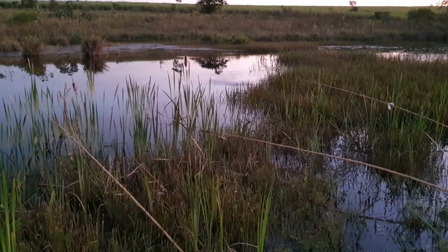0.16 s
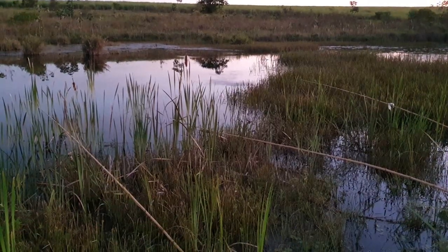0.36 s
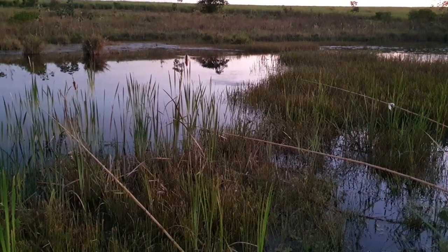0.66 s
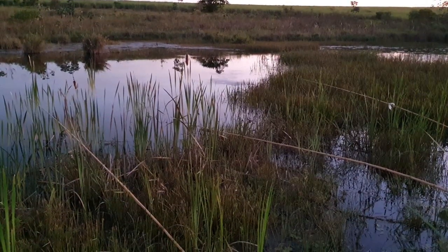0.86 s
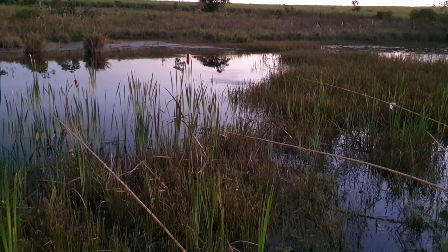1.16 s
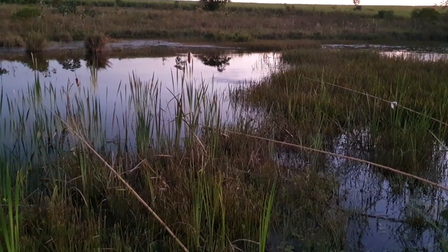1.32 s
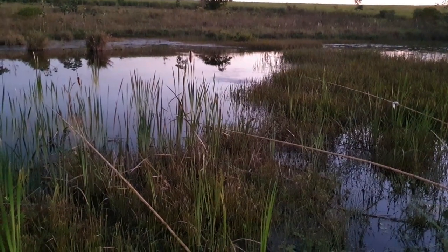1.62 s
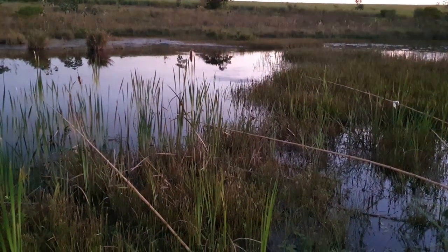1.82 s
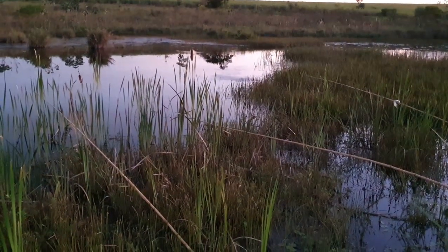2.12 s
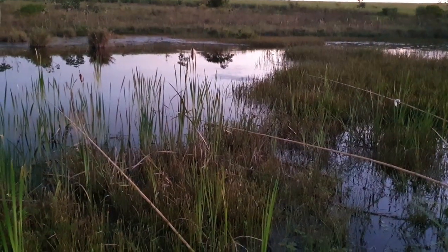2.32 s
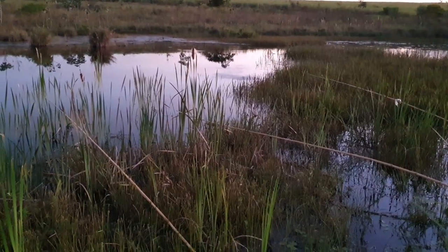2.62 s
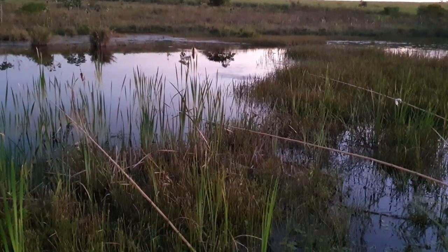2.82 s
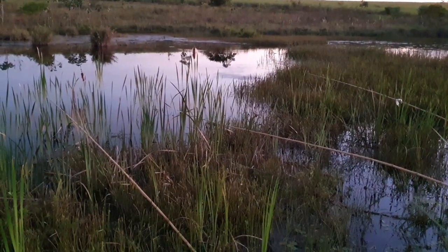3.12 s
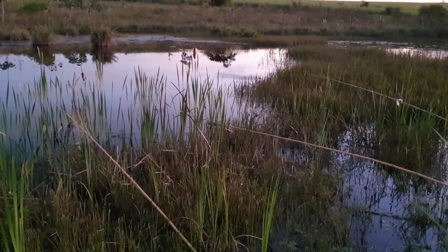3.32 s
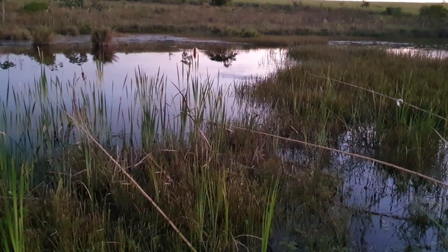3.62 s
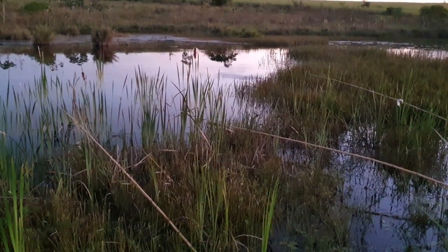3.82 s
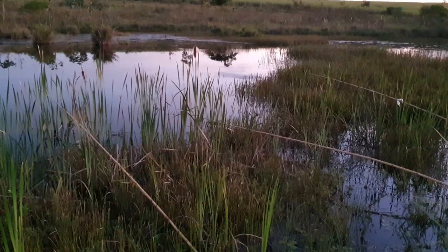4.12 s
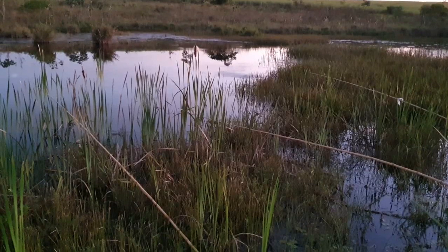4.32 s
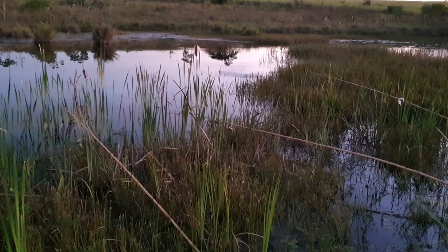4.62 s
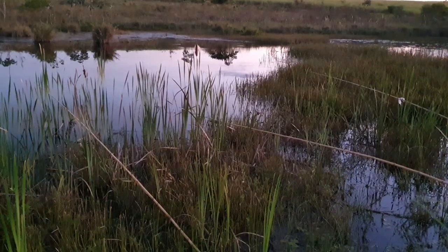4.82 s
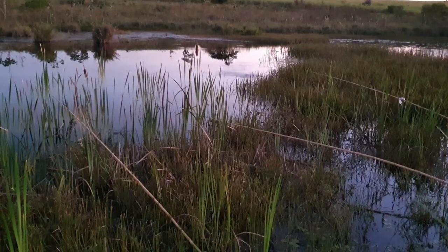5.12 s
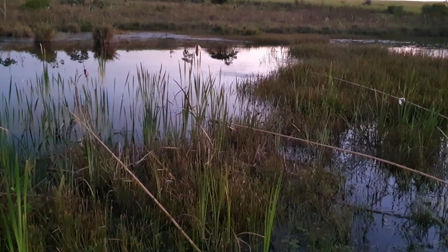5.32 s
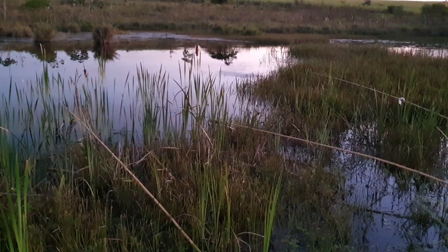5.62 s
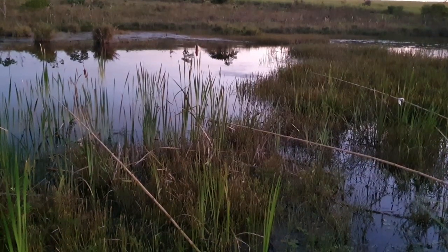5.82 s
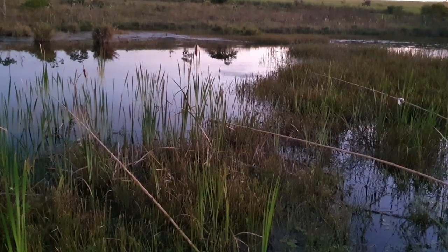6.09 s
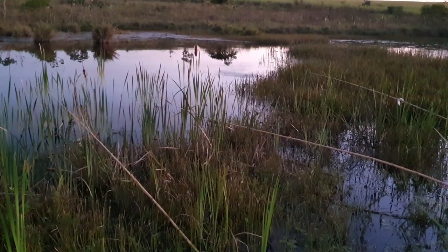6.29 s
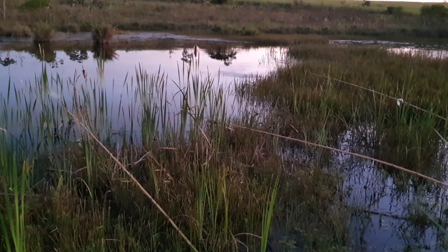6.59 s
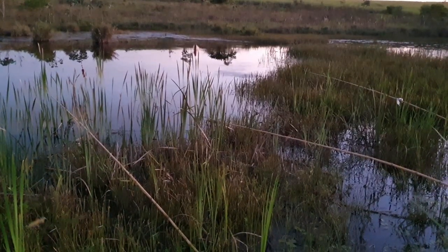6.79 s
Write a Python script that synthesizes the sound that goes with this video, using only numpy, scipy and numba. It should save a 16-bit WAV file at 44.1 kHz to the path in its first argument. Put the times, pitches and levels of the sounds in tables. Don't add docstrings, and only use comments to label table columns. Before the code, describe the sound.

Dense evening frog chorus at a reedy pond: near raspy croaking notes, overlapping nasal toad buzzes, fast katydid ticking and an occasional small plop.

```python
import sys
import numpy as np
from scipy import signal
from scipy.fft import rfft, irfft
from scipy.io import wavfile
from numba import njit

SR = 44100
rng = np.random.default_rng(int(sys.argv[2]) if len(sys.argv) > 2 else 0)


def transcribe(u):
    v = np.clip(np.atleast_2d(u).T, -1, 1)
    q = np.round(v * 32767).astype(np.int16)
    wavfile.write(sys.argv[1], SR, q)


def boost(x):
    u = np.asarray(x, float) / 20
    return 10 ** u


N = 306495
PORT_LAG_S = 0.000431
# (frequency [Hz], level [dB], decay t60 [s])
TOAD_MODES = [
    (5073, 2.5, 0.0075),
    (3260, -1.5, 0.0047),
    (8970, -6.5, 0.0029),
    (3360, -12.5, 0.014),
    (6480, -4.5, 0.0034),
]


@njit
def rings(size, start, hz, gain, rise, t60):
    out = np.zeros(size)
    for k in range(len(start)):
        i0 = max(int(np.ceil(start[k])), 0)
        turn = 2j * np.pi * hz[k] / SR - np.log(1000.) / (t60 * SR)
        p, q = np.exp(turn), np.exp(-1 / (rise * SR))
        z, e = gain[k] * np.exp(turn * (i0 - start[k])), q ** (i0 - start[k])
        for i in range(i0, min(i0 + int(t60 * SR * 3 / 4), size)):
            out[i] += z.imag * (1 - e) ** 2
            z, e = z * p, e * q + 1e-30
    return out


def heard(s, hz, db, rise, t60, pan_db=0., lag=PORT_LAG_S):
    s, hz, db, pan_db, lag = (1. * v.ravel() for v in np.broadcast_arrays(s, hz, db, pan_db, lag))
    ports = []
    for k in range(2):
        gain = boost(db + (.5 - k) * pan_db)
        ports.append(rings(N, (s + k * lag) * SR, hz, gain, 1. * rise, 1. * t60))
    return np.array(ports)


def curve(table, s):
    t, *columns = np.transpose(table)
    return [np.interp(s, t, c) for c in columns]


def reeds(x, db, t60):
    t = np.arange(SR // 5) / SR
    tail = rng.standard_normal((2, len(t))) * boost(-60 * t / t60) * (t > .003)
    tail *= boost(db) / np.sqrt(np.sum(tail ** 2, axis=1, keepdims=True))
    return x + signal.fftconvolve(x, tail, axes=1)[:, :N]


def pulses(table, period_s):
    peak, before, after = np.transpose(table)[:3, :, None]
    beat = np.arange(-10, 9) / 2
    silent = (beat < -before - .25) | (beat > after + .25)
    return peak + period_s * beat, beat, silent


def air():
    # (frequency [Hz], level [dB per Hz])
    evening = [(25, -112), (68, -91.5), (135, -101), (500, -100), (1400, -107), (2200, -99), (3100, -85.5),
               (4500, -69.5), (6000, -104), (7500, -106), (9500, -95), (12500, -93.5), (14400, -99),
               (14900, -112)]
    hz = np.fft.rfftfreq(N, 1 / SR) + 1
    at_hz, level_db = np.transpose(evening)
    colour = boost(np.interp(np.log(hz), np.log(at_hz), level_db, right=-150))
    shared = np.clip(.45 - hz / 2500, 0, 1)
    common, left, right = rfft(rng.standard_normal((3, N)))
    tilt_db = np.interp(hz, (300, 5000, 13000), (-1.5, 1.2, -4))
    ports = np.sqrt(shared) * common + np.sqrt(1 - shared) * np.array([left, right])
    ports = boost(np.array([tilt_db, -tilt_db]) / 2) * ports
    return irfft(colour * ports, N) * np.sqrt(SR / 2) * boost(2.5)


def bleat(s, db, pan_db, sac_hz, lag, head, modes):
    out = heard(s, sac_hz, db, 0.00021, 0.011, pan_db, lag)
    for hz, mode_db, t60 in modes:
        out += heard(s, hz * head, db + mode_db, 0.00038, t60, pan_db, lag)
    return out


def solo_toads():
    # (start [s], end [s], level [dB], left minus right [dB], first pitch [Hz])
    solo_bleats = [
        (-.25, .859, -27.5, -5, 4430),
        (.699, 1.51, -34, -4, 3400),
        (1.198, 1.58, -36.5, -3, 5000),
        (1.75, 2.65, -31.5, 1, 4260),
        (3.101, 4, -40.5, -4, 4400),
        (4.252, 5.12, -30.5, -1, 4600),
        (5.06, 6.03, -27.5, -5.5, 4070),
        (4.92, 5.85, -32.5, 7, 3960),
        (6, 7.3, -34.5, -7, 3700),
        (4.68, 5.1, -41.5, 3, 5100),
    ]
    close_rows = (0, 6, 7, 9)
    out = 0
    for row, (start, end, db, pan_db, hz0) in enumerate(solo_bleats):
        hz1 = 4716 + 20 * (db + 29.5)
        draw = rng.standard_normal((200, 2)).T
        part = np.arange(200) / (126 * (end - start))
        filled = np.minimum(part, 1)
        rate_hz = np.interp(part, (0, 1), (133, 119))
        s = start + np.cumsum((1 + 0.00499 * draw[0]) / rate_hz)
        swell_db = -14 * np.exp(-part / 0.056) - 9 * part ** 6 - 200 * (part > 1) + 1.05 * draw[1]
        lag = PORT_LAG_S * rng.uniform(-1.175, 1)
        modes = TOAD_MODES if row in close_rows else TOAD_MODES[:2]
        sac_hz = hz0 + (hz1 - hz0) * filled ** 0.87
        out = out + bleat(s, db + 7 + swell_db, pan_db, sac_hz, lag, 0.986 + 0.024 * filled, modes)
    return reeds(out, -4.0, 0.02)


def toad_crowd(count=12):
    # (time [s], level [dB], left minus right [dB])
    crowd_swell = [(0, -32, 0), (.6, -32, 2), (.9, -37.5, 2), (1.3, -31, -1.5), (1.65, -35.5, 1),
                   (2.0, -32, 1.5), (2.45, -30.5, 0.5), (2.75, -36, 0), (3.05, -40.5, 2.5), (3.5, -37.5, 4),
                   (4.1, -38, 1.5), (4.45, -35.5, 4.5), (5.0, -38.5, -3.5), (5.25, -32.5, 0),
                   (5.8, -31, 4.5), (6.08, -37, 0.5), (6.5, -36, 6), (6.95, -37, 2.5)]
    size, side = rng.uniform(-1, 1, (count, 2, 1)).transpose(1, 0, 2)
    draw = rng.standard_normal((count, 2, 950)).transpose(1, 0, 2)
    part = (np.arange(950) / 170 + np.arange(count)[:, None] / count) % 1
    s = -.1 + np.cumsum((1 + .012 * draw[0]) / (135 + 4 * size - 17 * part), axis=1)
    db, pan_db = curve(crowd_swell, s)
    db = db + 2.0 + 15 * np.log10(np.sin(np.pi * part) + 0.016) + 2.67 * draw[1]
    lag = PORT_LAG_S * np.minimum(0.74 + 1.63 * side, 1)
    sac_hz = (4050 + 500 * part) * (1 + 0.098 * size)
    head = 1 + 0.081 * size + 0.017 * draw[0]
    return reeds(bleat(s, db, pan_db, sac_hz, lag, head, TOAD_MODES[:2]), -1.73, 0.21)


def distant_frogs():
    # (time [s], level [dB])
    rasp_swell = [
        (0.0, -60),
        (0.44, -44),
        (1.86, -62),
        (2.17, -44.5),
        (3.12, -90),
        (3.6, -61),
        (3.89, -44),
        (4.95, -61),
        (5.21, -49.5),
        (6.95, -55),
    ]
    draw = rng.random((1400, 4)).T
    s = draw[0] * N / SR
    db = curve(rasp_swell, s)[0] - 1.5 + 6 * draw[1]
    hz = 1500 + 1200 * draw[2] ** 0.655
    sac = heard(s, hz, db, 0.00039, 0.02, -4.5)
    body = heard(s, 650 + 350 * draw[3], db - 12.5, 0.0016, 0.053, -3.1)
    return reeds(sac + body, -0.32, 0.42)


def far_frogs():
    # (start [s], pulses [count], peak level [dB])
    answers = [(0.0332, 4.93, -30), (0.4341, 4.9, -30.5), (0.8103, 5.54, -32.5), (1.2307, 5.5, -34.5),
               (1.6612, 6.2, -38), (2.1124, 7.3, -36), (2.2074, 4, -41), (2.6022, 4.5, -35),
               (2.9519, 5.07, -38), (3.6128, 6.2, -33.5), (4.0075, 5.2, -31.5), (4.0999, 6, -33.5),
               (4.4546, 4.44, -29), (4.784, 5.44, -31), (5.2468, 4.8, -33), (5.436, 3.8, -34),
               (5.6295, 5.6, -34.5), (5.8558, 6.9, -31.5), (6.1114, 4.53, -31.5), (6.5426, 4, -28.5),
               (6.9297, 1.6, -28.5)]
    start, count, peak_db = np.transpose(answers)[:, :, None]
    beat = np.arange(14) / 2 - .5
    draw = rng.standard_normal((len(answers), 6, 14)).transpose(1, 0, 2)
    s = start + .0258 * beat + 0.000705 * draw[0]
    weak_db = 8 * (beat % 1)
    db = peak_db - 24 * ((beat + 2.05) / (count + 0.18) - .55) ** 2 - weak_db
    db = db - 2.2 * np.exp(-beat / 1.46) + 1.5 * draw[5]
    db = db - 200 * (beat > np.round(count) - .75)
    filling_db = 25 * np.exp(-np.maximum(beat, 0) / 1.1)
    out = heard(s - .002, 735 + 15 * draw[4], db - 10.5 - 12 * (beat % 1), 0.0013, 0.044, -0.68)
    sac_tones = ((1815, 1.5, -8.5), (2146, 8.5, -6.0), (2416, 7.0, -5.5))  # (Hz, dB, left minus right dB)
    for d, (hz, mode_db, pan_db) in zip(draw[1:], sac_tones):
        tone_db = db + mode_db - filling_db * (hz / 1700 - 1)
        out += heard(s, hz * (1 + 0.03 * d), tone_db, 0.0011, 0.017, pan_db)
    return reeds(out, -0.13, 0.12)


def katydid():
    chirp_pace = [.0638, .488, .9125, 1.3413, 1.7681, 2.196, 2.6071, 3.0386, 3.4601, 3.8812, 4.3014, 4.732,
                  5.156, 5.5905, 5.9898, 6.4071, 6.8357, 7.26]
    count = len(chirp_pace)
    chirps = np.interp(np.arange(6 * count - 6) / 6, np.arange(count), chirp_pace)
    stroke, tooth = np.arange(5)[:, None], np.arange(5)
    s = chirps[:, None, None] + 0.013 * stroke + 0.0026 * tooth
    draw = rng.standard_normal((4,) + s.shape)
    db = -41.5 - 8.1 * (stroke == 4) - 6 * tooth ** 0.8 + 0.99 * draw[0]
    s, db = (s + 0.000187 * draw[1]).ravel(), db.ravel()
    low, high = draw[2].ravel(), draw[3].ravel()
    out = heard(s, 12380 * (1 + 0.02 * low), db - 2.5, .0001, 0.0069, -6.5)
    out += heard(s, 13040 * (1 + 0.02 * high), db - 5.5, .0001, 0.0069, -6.5)
    out += heard(s, 13600 * (1 + 0.024 * high), db + 0.5, .00008, .0022, -5.0)
    return reeds(out, 1.2, 0.027)


def hoots():
    # (start [s], level [dB])
    hoot_notes = [
        (.2, -65),
        (1.08, -64.5),
        (1.9, -63),
        (2.64, -64),
        (3.38, -66),
        (4.12, -65),
        (4.91, -66.5),
        (5.76, -64),
        (6.54, -67),
    ]
    # (loudest time [s], level [dB], time to fade 20 dB [s])
    low_calls = [
        (2.9, -62.5, 0.54),
        (5.7, -60.5, 0.96),
    ]
    t, out = np.arange(N) / SR, 0
    for s, db in hoot_notes:
        age = np.clip(t - s, 0, .13)
        swell = np.sin(np.pi * age / .13) ** 2
        out = out + boost(db) * swell * np.sin(2 * np.pi * (530 * age - 380 * age ** 2))
    draw = rng.random((600, 2)).T
    s = draw[0] * N / SR
    call_db = [db - 20 * np.where(s < at, 3.0, 1) * abs(s - at) / fade for at, db, fade in low_calls]
    return out + heard(s, 270 + 230 * draw[1], np.max(call_db, axis=0) + 4, 0.02, 0.31)


def near_pulses():
    # (loudest pulse [s], pulses before [count], pulses after [count], peak [dB], weak pulse [dB])
    near_notes = [
        (0.3201, 3, 2, -19.5, -7.5),
        (0.6938, 3, 2, -20.5, -10),
        (1.1122, 3, 2, -19.5, -5.5),
        (1.5297, 3, 2, -20.5, -8),
        (2.0192, 3, 2, -21.5, -19),
        (4.2257, 5, 1.5, -18, -9),
        (4.5264, 3, 3, -18, -10.5),
        (5.1269, 2.5, 2, -21, -7.5),
        (6.3625, 2.5, 3, -19.5, -2.5),
        (6.7977, 3, 2, -19, -4.5),
    ]
    # (time [s], peak level [dB])
    stutters = [
        [(3.6264, -31), (3.6379, -30.5), (3.68, -23), (3.6976, -22.5), (3.716, -22), (3.7283, -34),
         (3.7476, -22), (3.7556, -24), (3.7975, -25), (3.8227, -29.5)],
        [(5.8794, -29), (5.9037, -26), (5.9294, -32), (5.9384, -25), (5.9483, -22), (5.9664, -24),
         (5.9787, -25), (6.0048, -23), (6.0455, -26), (6.0717, -26.5)],
    ]
    s, beat, silent = pulses(near_notes, .0253)
    before, _, peak_db, weak_db = np.transpose(near_notes)[1:, :, None]
    draw = rng.standard_normal((len(s), 3, len(beat))).transpose(1, 0, 2)
    weak = 2 * (beat % 1)
    swell_db = np.where(beat < 0, 2.5 * beat, -2 * beat ** 1.42)
    db = peak_db + swell_db + weak * (weak_db + 1.6 * draw[0])
    db = db + 0.88 * (beat == 0) - 2.1 * (beat < .25 - before)
    hz = 2398 + 5.9 * beat - 60 * weak + 70 * np.minimum(beat + 3, 0) + 25 * draw[1]
    s = s + 0.000384 * (1 + weak) * draw[2]
    at, at_db = np.transpose(stutters, (2, 0, 1))
    at_hz = 2455 - 400 * np.exp(-(at - at[:, :1]) / 0.062)
    return [np.append(a[~silent], b) for a, b in ((s, at), (db, at_db), (hz, at_hz))]


def near_frog():
    s, db, hz = near_pulses()
    sac = heard(s, hz, db + 11.0, 0.0015, 0.014, -4.5)
    sac += heard(s, hz + 170, db - 0.5, 0.0061, 0.017, 22.0)
    under = heard(s, hz - 230, db - 11.5, 0.0028, 0.035, -8.0)
    throat_hz = 0.694 * hz + 70 * rng.standard_normal(len(s))
    under += heard(s, throat_hz, db - 20, 0.0018, 0.04, -9.5)
    body = heard(s, 827, db - 11.5, 0.0012, 0.011, 1.6) + heard(s, 1288, db - 18, 0.0015, 0.033, 1.0)
    return reeds(sac + under + body, -5, 0.2)


def croaks():
    # (loudest pulse [s], pulses before [count], pulses after [count], peak level [dB], pitch [Hz])
    croak_notes = [(.343, 1, 2, -43, 824), (.7605, 2, 1, -42.5, 770), (1.1455, 2, 1, -43.5, 780),
                   (1.9392, 0, 0, -42.5, 827), (2.6877, 0, 0, -49.5, 860), (3.8985, 1, 1, -40.5, 840),
                   (3.9839, 0, 0, -47, 890), (4.3655, 1, 2, -41, 860), (4.8257, 2, 2, -40.5, 818),
                   (5.1735, 1, 2, -43.5, 790), (5.6, 2, 2, -42, 797)]
    s, beat, silent = pulses(croak_notes, .0262)
    peak_db, hz = np.transpose(croak_notes)[3:, :, None]
    on = ~silent & (beat % 1 == 0)
    db, hz = peak_db - 1.3 * beat ** 2, hz - 28.3 * beat
    draw = rng.standard_normal((len(s), 2, len(beat))).transpose(1, 0, 2)
    s, db = s + 0.00138 * draw[0], db + 1.3 * draw[1]
    return reeds(heard(s[on], hz[on], db[on] + 12, 0.0024, .03, -5.0), -8, 0.18)


def knocks():
    # (time [s], level [dB], frequency [Hz], decay t60 [s])
    plops = [(1.05, -65, 427, .6), (1.3, -64, 417, 0.88), (1.435, -46.5, 476, 0.022),
             (1.93, -48.5, 940, 0.096), (1.94, -53, 457, 0.12), (1.968, -47, 400, 0.033),
             (2.46, -24.5, 1240, 0.0051), (2.46, -39.5, 350, 0.011), (3.46, -53, 367, 0.066),
             (3.665, -47, 1120, .04), (3.685, -49, 1000, .04), (2.46, -28, 2100, 0.0044),
             (5.6, -57, 139, 0.04)]
    return sum(heard(np.array([s]), hz, db, 0.00065, t60, 2.0, 0) for s, db, hz, t60 in plops)


def cricket():
    s = np.arange(5.0, 7, 1 / 80.0)
    draw = rng.standard_normal((len(s), 3)).T
    db = np.interp(s, (5.0, 5.9, 7), (-66, -58, -57)) + 3.1 * draw[0]
    trill = heard(s + 0.001 * draw[1], 8955 + 25 * draw[2], db + 10.5, 0.00081, 0.025, 0.56)
    return reeds(trill, -1.5, 0.057)


def scene():
    frogs = near_frog() + far_frogs() + croaks() + distant_frogs() + hoots()
    return frogs + solo_toads() + toad_crowd() + katydid() + cricket() + knocks() + air()


def band_limit(x):
    return signal.sosfilt(signal.butter(12, 15360, fs=SR, output="sos"), x)


def record(dry):
    top_cut = signal.ellip(5, .3, 22, 14480, fs=SR, output="sos")
    mic = signal.sosfilt(top_cut, dry)
    return band_limit(mic)


dry = scene()
out = record(dry)
transcribe(out)
```